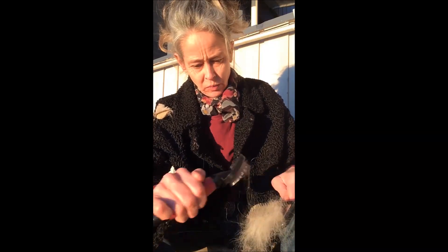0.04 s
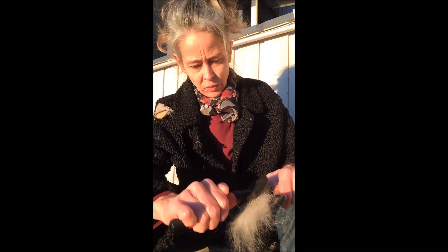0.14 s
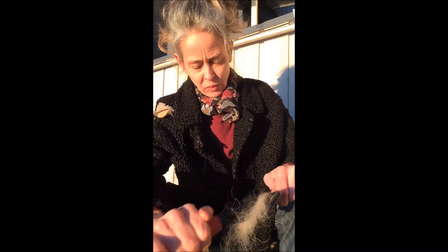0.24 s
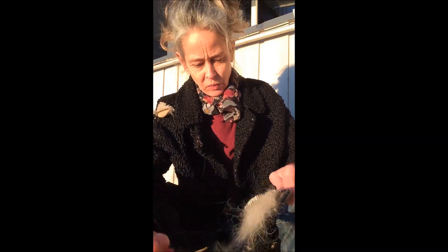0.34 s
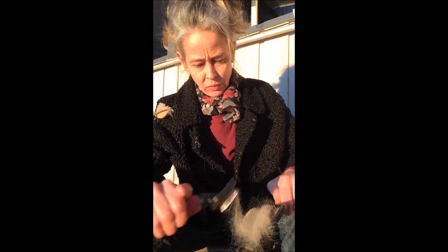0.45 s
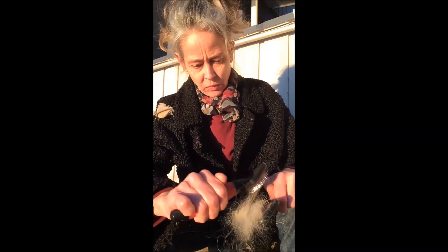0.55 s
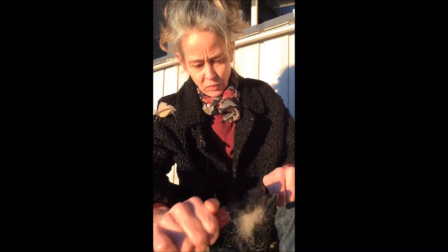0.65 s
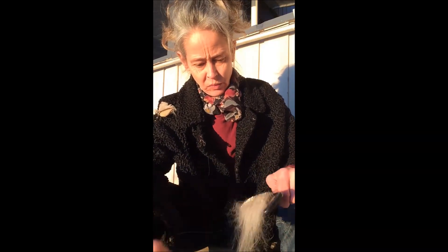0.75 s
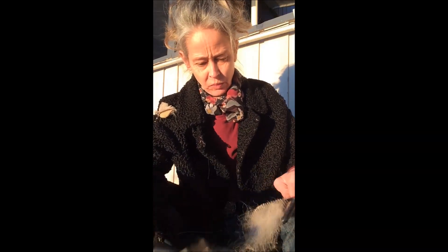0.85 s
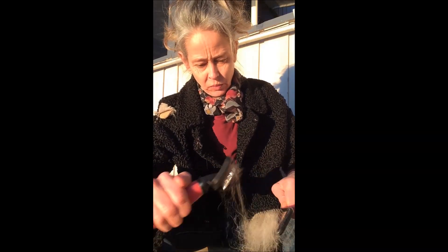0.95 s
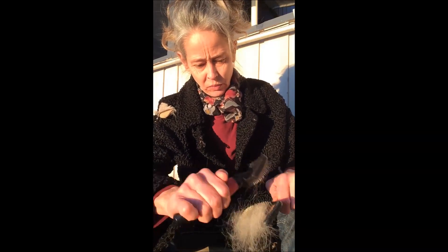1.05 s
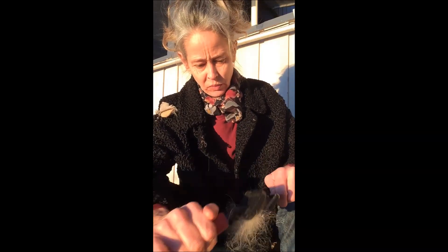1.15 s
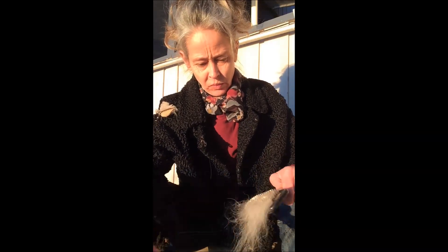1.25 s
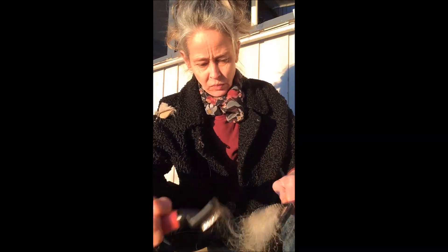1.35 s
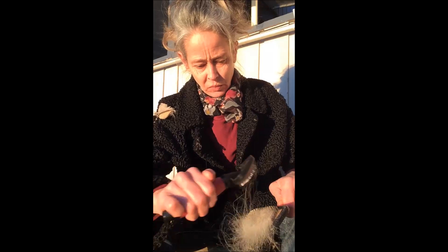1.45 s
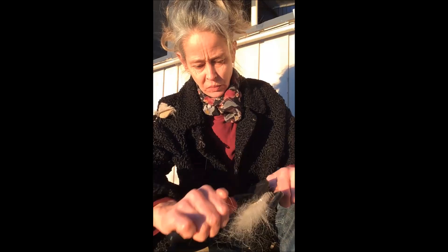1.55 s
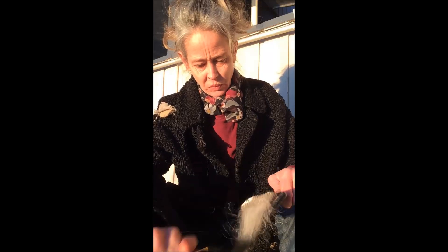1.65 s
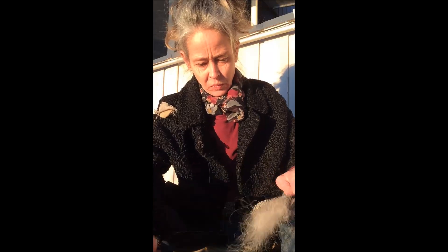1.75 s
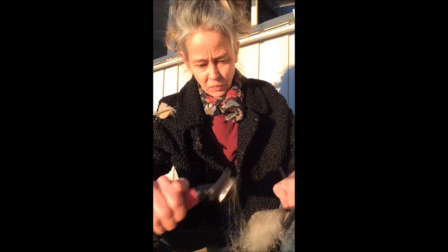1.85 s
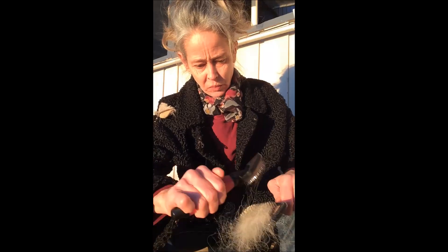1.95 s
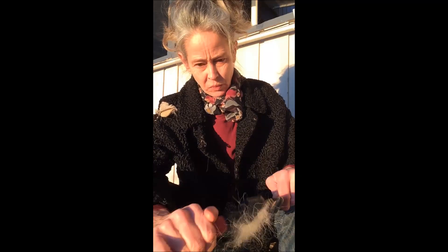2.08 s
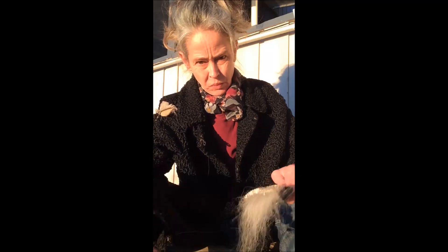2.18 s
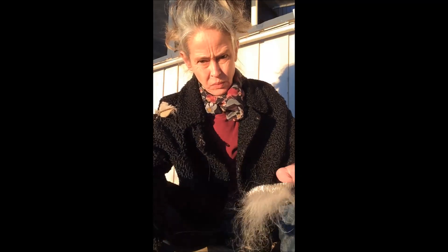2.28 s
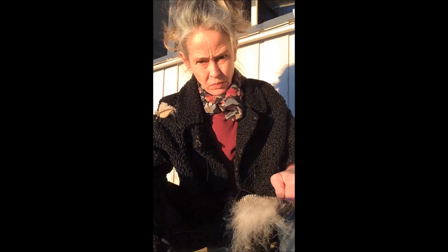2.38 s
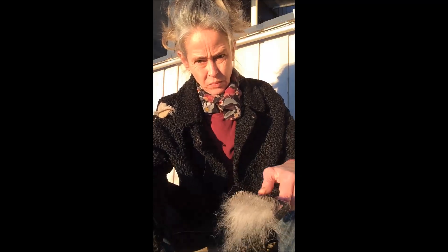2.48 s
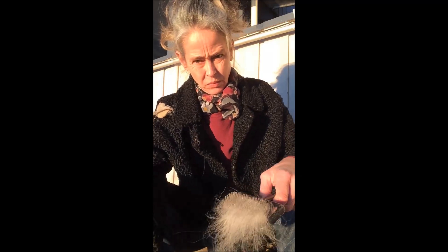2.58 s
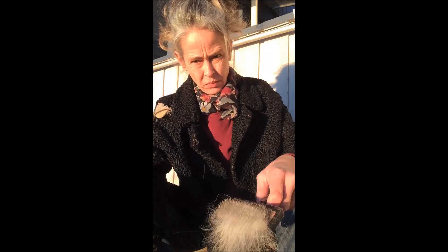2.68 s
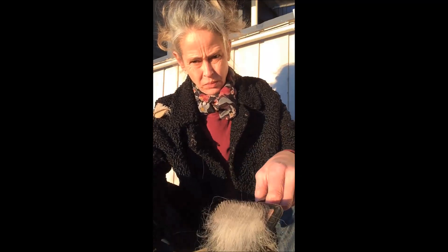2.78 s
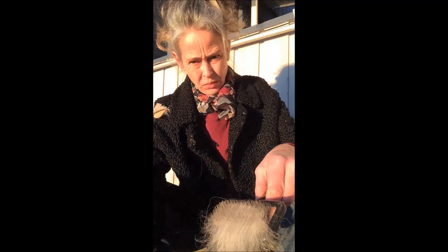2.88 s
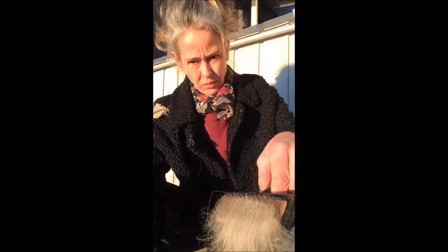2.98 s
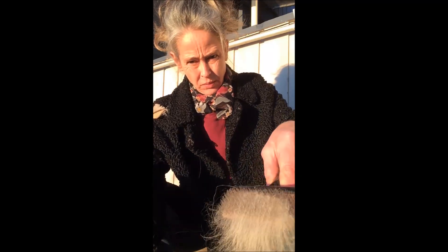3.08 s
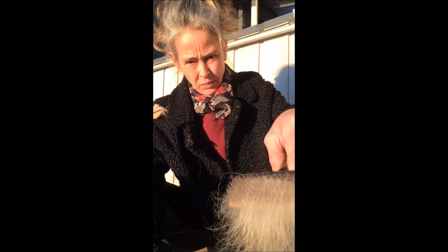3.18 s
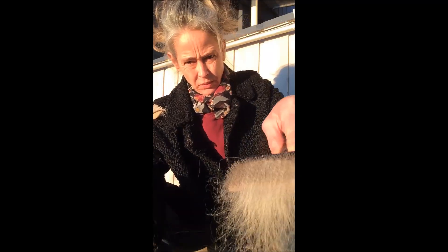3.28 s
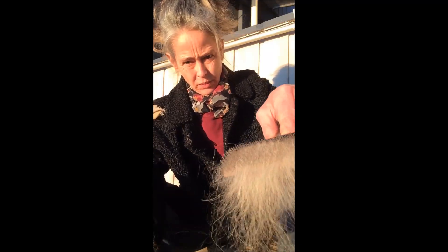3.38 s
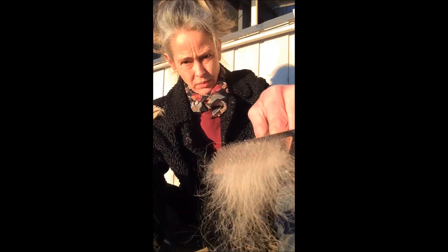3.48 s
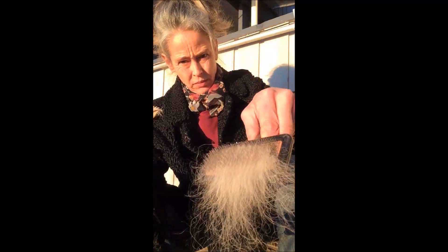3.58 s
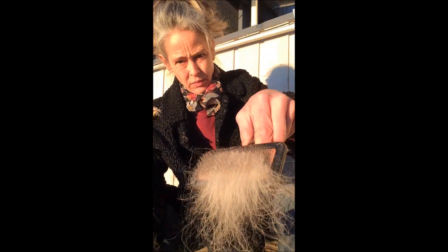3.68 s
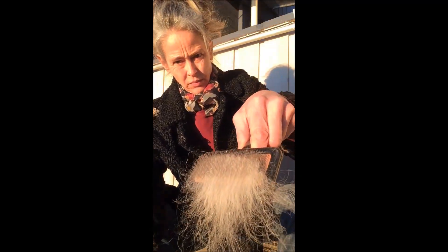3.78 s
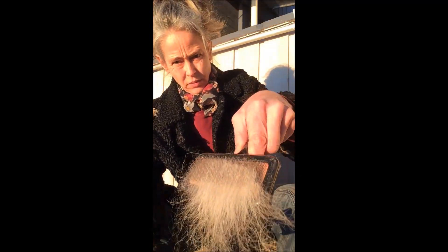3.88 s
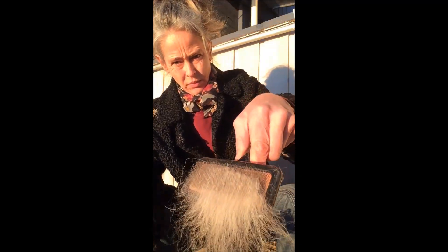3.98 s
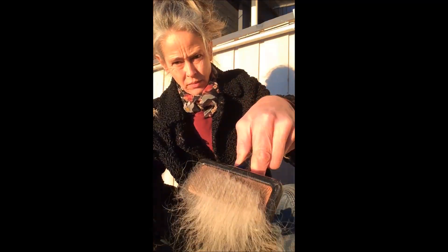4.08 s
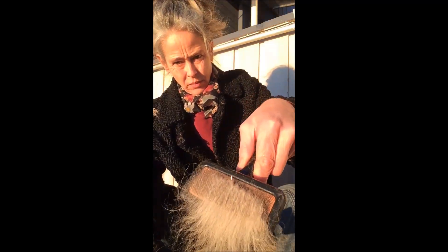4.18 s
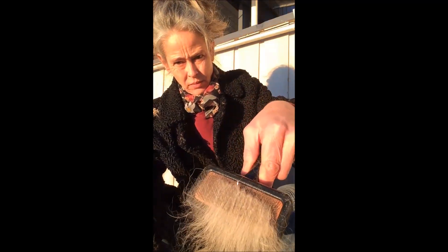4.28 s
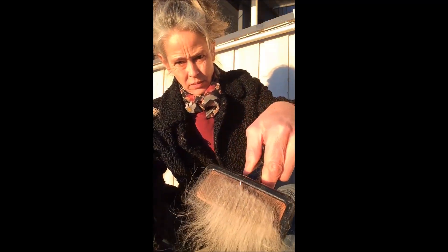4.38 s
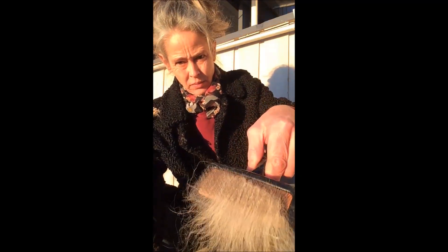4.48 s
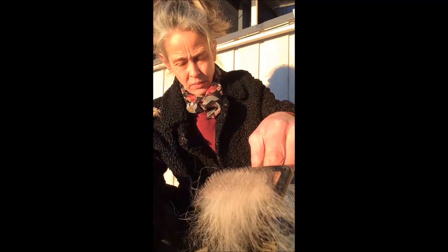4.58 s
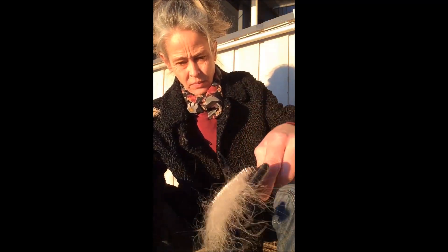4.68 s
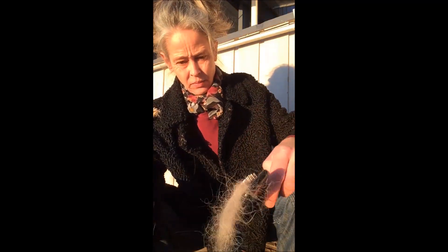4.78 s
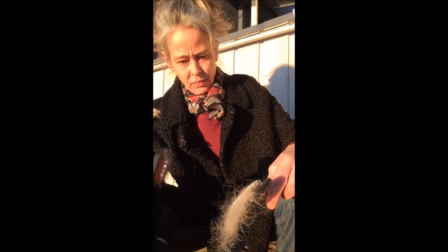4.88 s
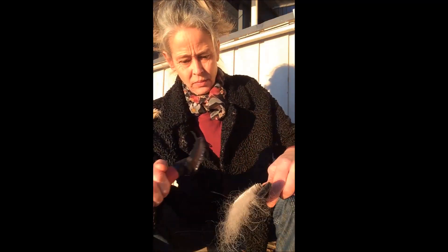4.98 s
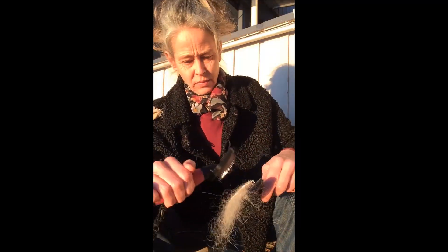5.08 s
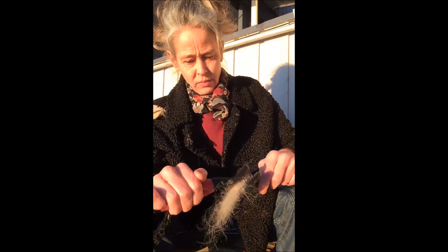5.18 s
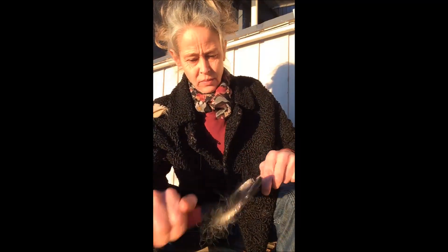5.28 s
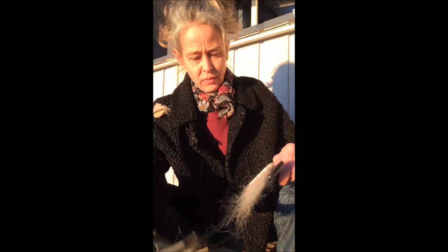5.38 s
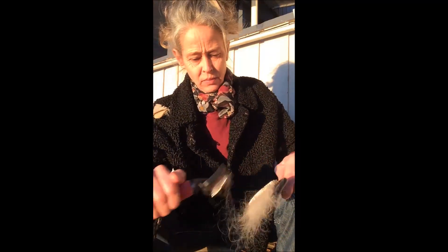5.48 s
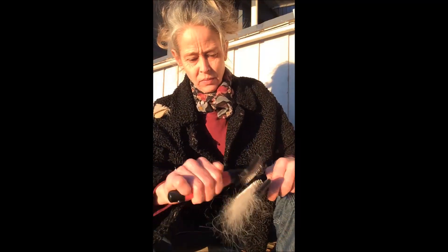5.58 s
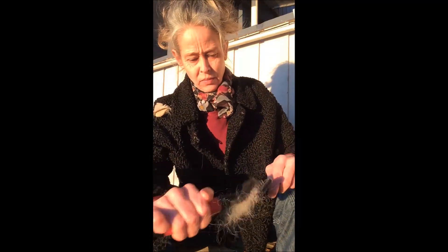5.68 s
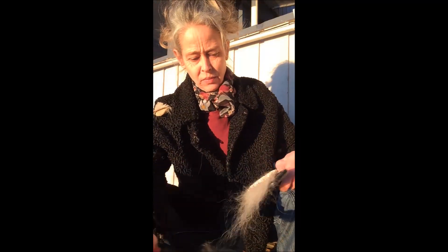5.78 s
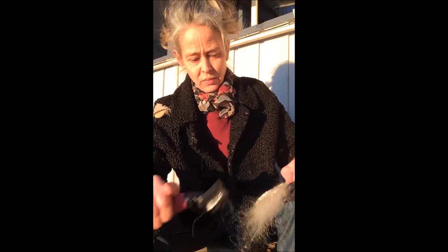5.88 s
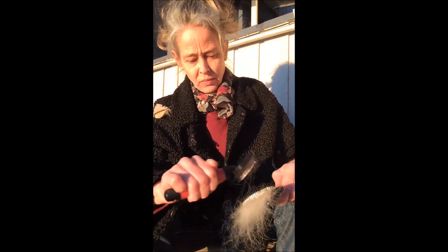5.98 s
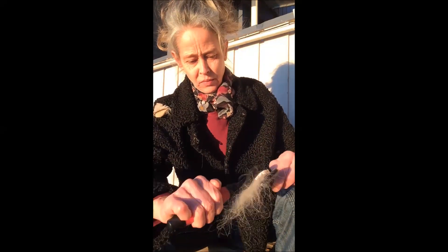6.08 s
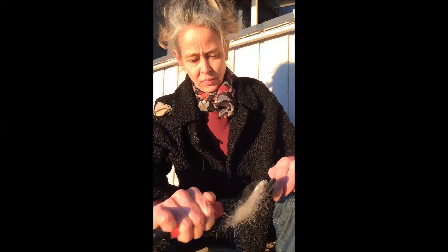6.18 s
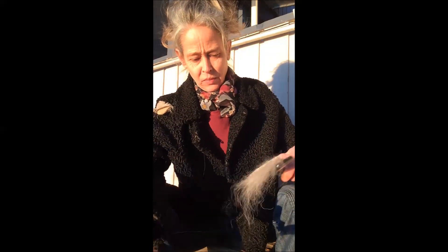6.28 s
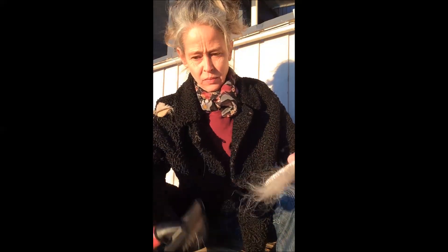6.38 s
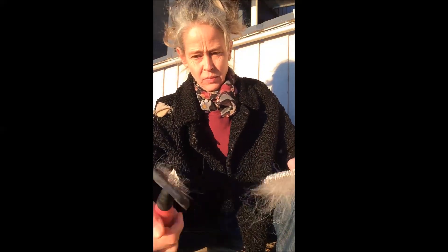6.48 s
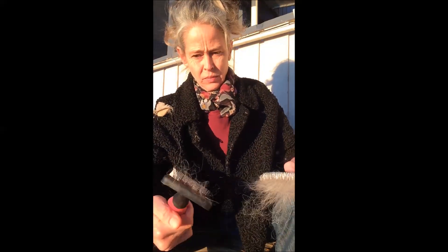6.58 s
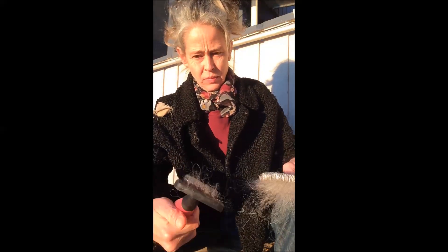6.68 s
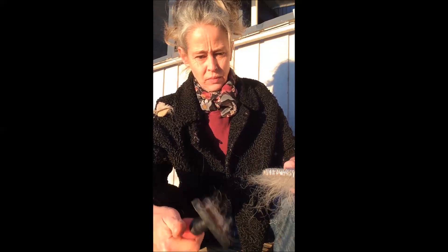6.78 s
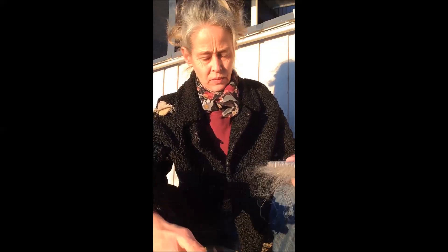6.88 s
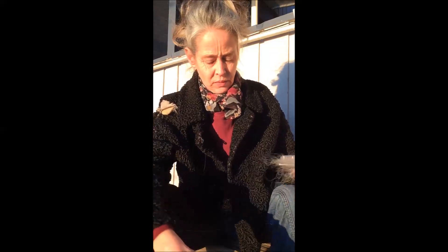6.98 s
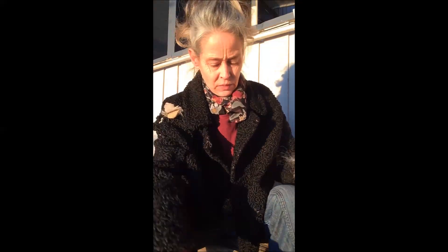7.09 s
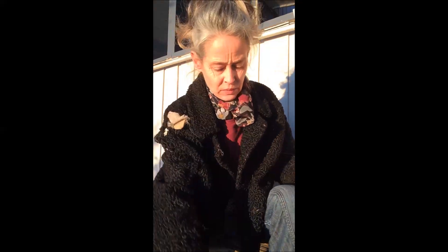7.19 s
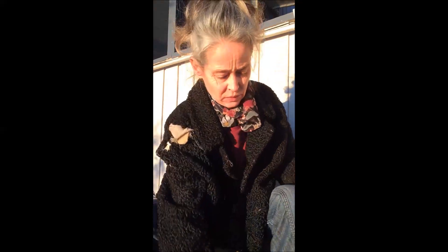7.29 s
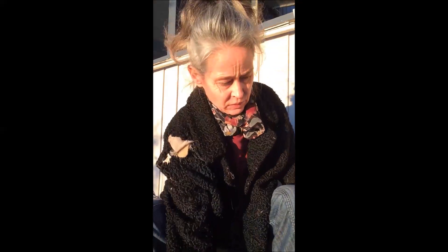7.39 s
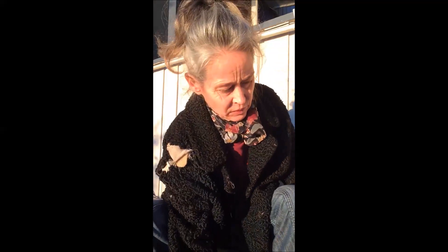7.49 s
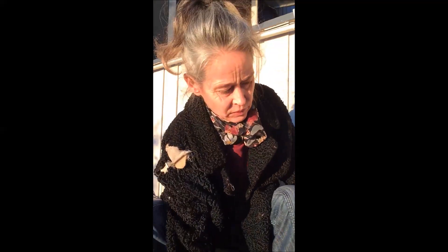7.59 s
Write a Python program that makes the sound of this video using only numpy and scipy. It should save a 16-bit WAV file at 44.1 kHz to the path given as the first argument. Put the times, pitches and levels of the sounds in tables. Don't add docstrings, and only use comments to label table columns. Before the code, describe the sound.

Close to a phone microphone outdoors, two wire pet brushes are knocked together and pulled apart through hair. Five short dry scratches come about half a second apart, each a light plastic knock swelling into bright wiry rasp and sharp snaps. After three quiet seconds of faint coat rustle and distant traffic, three more strokes follow, then cloth rustles softly.

```python
import sys
import numpy as np
from scipy import signal
from scipy.io import wavfile
from scipy.ndimage import uniform_filter1d

SR = 44100
rng = np.random.default_rng(int(sys.argv[2]) if len(sys.argv) > 2 else 0)


def inscribe(sig):
    pcm = np.round(np.clip(np.atleast_2d(sig).T, -1, 1) * 32767)
    wavfile.write(sys.argv[1], SR, pcm.astype(np.int16))


def to_linear_factor(level_db):
    exponent = np.asarray(level_db, float) / 20
    return 10 ** exponent


N = 337365

# pitch in Hz, width in Hz, level in dB.
PIN_MODES = [(3120, 400, -1), (3830, 760, 1), (4560, 1200, 3), (5130, 1000, -0.5), (6960, 970, -13)]
# pitch in Hz, width in Hz, level in dB.
TIP_MODES = [(5000, 650, -3), (6830, 1800, -1), (10760, 2300, -3.5), (12620, 1400, -4.5),
             (16200, 2400, -2.5)]
FREE_DB_S = 1801


def evened(x):
    return x / np.sqrt(np.mean(x ** 2) + 1e-20)


def columns(rows, t):
    s, *values = np.transpose(rows)
    return [np.interp(t, s, v) for v in values]


def add(mix, s, sound):
    part = mix[round(s * SR):][:len(sound)]
    part += sound[:len(part)]


def resonate(x, hz, width):
    return signal.lfilter(*signal.iirpeak(min(hz, 0.45 * SR), hz / width, SR), x)


def body(x, modes):
    total = 0
    for k, (hz, width, db) in enumerate(modes):
        total = total + (-1) ** k * to_linear_factor(db) * resonate(x, hz, width)
    return evened(total)


def slips(per_s, spread_db, clump_db, clump_s):
    chance, size, sign, drift = rng.random((N, 4)).T
    height = to_linear_factor(-spread_db * np.log(size * 0.98 + 0.02))
    clicks = (chance < per_s / SR) * height * np.sign(sign - 0.5)
    span = max(round(clump_s * SR), 2)
    clumps = evened(uniform_filter1d(uniform_filter1d(drift - 0.5, span), span))
    return clicks * to_linear_factor(clump_db * clumps)


def shaped(spectrum, gain_db, patch_db):
    hz = np.fft.rfftfreq(1024, 1 / SR)
    a, b, patches = rng.standard_normal((N // 256 + 5, 513, 3)).T
    patches = evened(uniform_filter1d(uniform_filter1d(patches, 10, 0), 12, 1))
    f, db = np.transpose(spectrum)
    colour_db = np.interp(np.log(hz + 1), np.log(f), db)[:, None]
    z = (a + 1j * b) * to_linear_factor(colour_db + gain_db + patch_db * patches)
    return signal.istft(z, nperseg=1024, noverlap=768)[1][:N]


def raking():
    # pitch in Hz, width in Hz, level in dB.
    pad_modes = [(313, 160, -20), (410, 100, -10), (716, 100, 0.5), (1000, 170, -8), (1280, 150, -2.5),
                 (1800, 900, -8.5)]
    # time in seconds, pad ringing in dB.
    press = [
        [(0.332, -61.5), (0.346, -52.5), (0.372, -34), (0.396, -30.5), (0.432, -34.5), (0.464, -49.5),
         (0.474, -43.5), (0.5, -76)],
        [(0.762, -49), (0.772, -43.5), (0.786, -45.5)],
        [(0.794, -37), (0.816, -28.5), (0.872, -34.5), (0.91, -71), (0.92, -66)],
        [(1.266, -41.5), (1.302, -30), (1.354, -36.5), (1.368, -55.5), (1.39, -71)],
        [(1.703, -46.5), (1.717, -42.5), (1.741, -29.5), (1.795, -33.5), (1.835, -76.5)],
        [(2.175, -52), (2.187, -34), (2.193, -48.5), (2.209, -32), (2.245, -32), (2.305, -37), (2.33, -76.5)],
        [(5.34, -69.5), (5.346, -63.5), (5.426, -36), (5.456, -33.5), (5.48, -72.5), (5.49, -70)],
        [(5.784, -55.5), (5.822, -30.5), (5.874, -32.5), (5.89, -59), (5.905, -58.5)],
        [(6.207, -52.5), (6.223, -54), (6.239, -44.5), (6.255, -57), (6.305, -43.5), (6.311, -39),
         (6.379, -29.5), (6.41, -70)],
    ]
    slide_lead_s = 0.0066
    drag = evened(slips(per_s=2200, spread_db=3.0, clump_db=1.5, clump_s=0.0012))
    flick = evened(slips(per_s=3000, spread_db=3.8, clump_db=3.0, clump_s=0.0015))
    layers = [wires(pad_modes, 1.2 * drag, 1500, 2.0),
              wires(PIN_MODES, drag, 2500, 2.5),
              wires(TIP_MODES, 1.1 * flick, 6000, 2.0)]
    pad, tip = np.zeros(N), tips()
    for rows in press:
        last_s = rows[-1][0]
        t = np.arange(rows[0][0] - slide_lead_s, last_s + 0.05, 1 / SR)
        add(pad, t[0], to_linear_factor(columns(rows, t)[0] - FREE_DB_S * np.maximum(t - last_s, 0)))
    pins = np.hypot(to_linear_factor(-3.5) * pad, to_linear_factor(-8) * tip)
    gains = uniform_filter1d(np.array([pad, pins, tip]), 130)
    return (gains * layers).sum(0)


def wires(modes, shared, per_s, clump_db):
    own = [slips(per_s, spread_db=3.0, clump_db=clump_db, clump_s=0.002) for _ in modes]
    total = 0
    for k, (catches, (hz, width, db)) in enumerate(zip(own, modes)):
        total = total + (-1) ** k * to_linear_factor(db) * resonate(evened(catches) + shared, hz, width)
    return evened(total)


def tips():
    # start in seconds, end in seconds, first level in dB, last level in dB.
    runs = [(0.335, 0.398, -45, -45), (0.406, 0.439, -32.5, -25), (0.756, 0.782, -40, -37),
            (.79, 0.858, -49.5, -43.5), (1.258, 1.328, -41, -47.5), (1.339, 1.348, -29, -29),
            (1.703, 1.748, -37, -43), (1.755, 1.793, -29.5, -28), (2.167, 2.225, -35.5, -46.5),
            (2.228, 2.272, -42.5, -41.5), (2.273, 2.3, -31.5, -28.5), (5.369, 5.397, -68.5, -52.5),
            (5.403, 5.42, -40, -40.5), (5.426, 5.454, -30, -28), (5.78, 5.829, -44, -45.5),
            (5.838, 5.874, -27.5, -26.5), (6.2, 6.248, -57.5, -49), (6.284, 6.318, -56.5, -53),
            (6.32, 6.343, -45.5, -43), (6.349, 6.379, -30.5, -23), (6.386, 6.382, -30.5, -34.5)]
    catch_s = 0.0035
    out = np.zeros(N)
    for start, end, first_db, last_db in runs:
        t = np.arange(0, end - start + 0.12, 1 / SR)
        late = np.maximum(t - (end - start), 0)
        parted = to_linear_factor(-FREE_DB_S * late) + to_linear_factor(-29.5 - 449 * late)
        course = to_linear_factor(np.interp(t, [0, end - start], [first_db, last_db]))
        add(out, start, np.minimum(t / catch_s, 1) * course * parted)
    return out


def snaps():
    # time in seconds, peak in dB, main pitch in Hz.
    torn_rows = [(0.4063, -14.5, 4900), (0.418, -14, 6120), (0.4244, -17.5, 10400), (0.4346, -8.5, 4730),
                 (0.7455, -15, 6000), (1.3105, -21, 3340), (1.3438, -6.5, 5000), (1.351, -23.5, 4510),
                 (1.6893, -12.5, 5040), (1.76, -9.5, 6400), (1.7854, -13.5, 10400), (1.7899, -12, 6580),
                 (1.7958, -11.5, 9370), (2.2335, -17, 4740), (2.2476, -14, 6140), (2.2768, -20, 4720),
                 (2.2934, -8.5, 5330), (5.4058, -21.5, 6530), (5.4263, -14, 8200), (5.4425, -6.5, 8200),
                 (5.836, -10.5, 4680), (5.842, -10, 5180), (5.87, -15, 4830), (6.342, -10.5, 6470),
                 (6.35, -10.5, 4130), (6.3564, -7.5, 10350), (6.365, -3.5, 5990), (6.3674, -6.5, 8400),
                 (6.375, -5, 7100), (6.3819, -20.5, 5040)]
    # time in seconds, peak in dB, main pitch in Hz.
    ticks = [(0.3329, -34.5, 5530), (0.473, -22.5, 3280), (2.3369, -38, 4130), (2.5581, -45, 6660),
             (2.6, -39.5, 5500), (4.0751, -43.5, 3700), (4.2194, -57, 3550), (5.0104, -40, 2600),
             (5.009, -37, 7000), (5.3209, -24, 3120), (5.361, -42.5, 4280), (5.227, -55.5, 3000),
             (5.3774, -27, 3820), (6.2159, -31, 4720), (6.2499, -35, 4960), (6.2735, -29, 4250),
             (6.2853, -19, 4210), (6.258, -31, 4500), (6.2215, -29.5, 4500), (6.2979, -26, 4330),
             (6.2907, -24, 4770), (6.305, -22.5, 4530), (1.678, -43, 6000), (2.2572, -20, 4340),
             (5.396, -18, 4500), (5.418, -18.5, 6900)]
    out, t = np.zeros(N), np.arange(1500) / SR
    click = 1.0 * (np.arange(len(t)) == 30)
    crack = body(click, PIN_MODES + TIP_MODES)
    crack = crack / abs(crack).max()
    # tip level in dB, strength of the crack
    rows = [(*row, -10, 1.195) for row in torn_rows] + [(*row, -23, 0.21) for row in ticks]
    noises = rng.standard_normal((len(rows), len(t)))
    fade = (1 - np.exp(-t / 0.00028)) * to_linear_factor(-60 * t / 0.008)
    for (s, db, hz, tips_db, lead), noise in zip(rows, noises):
        burst = 0.6 * evened(resonate(noise, hz, 0.31 * hz)) + to_linear_factor(tips_db + 3.0) * body(noise, TIP_MODES)
        add(out, s, to_linear_factor(db - 7.5) * (burst * fade + lead * crack))
    return out


def knocks():
    # time in seconds, peak in dB, pad pitch in Hz,
    # thud in dB over the peak, tip clash in dB over the peak.
    blows = [(0.316, -40, 830, -12, 8.5), (0.3203, -37.5, 650, -6, -11), (0.4727, -34.5, 790, -10.5, -5),
             (0.744, -22.5, 682, -17, -2), (1.2525, -19.5, 816, -7.5, 0), (1.6898, -18, 717, -29, 0),
             (2.1623, -25, 735, -8, -0.5), (3.9514, -59, 600, -20, -20), (5.76, -37.5, 1320, -13, -20),
             (5.7692, -28, 710, -1.5, -3.5), (6.1935, -24.5, 717, -21.5, -3.5)]
    # time in seconds, peak in dB, pad pitch in Hz, pin clash in dB over the peak.
    touches = [(0.308, -53, 670, 9), (1.2458, -34.5, 860, 7.5), (2.158, -27, 630, -5),
               (5.316, -39, 640, -2.5), (5.322, -37, 716, -8), (6.187, -35, 1000, 5.5)]
    out, t = np.zeros(N), np.arange(2600) / SR
    rows = [(s, db, hz, thud, -13.5, tip) for s, db, hz, thud, tip in blows]
    rows += [(s, db, hz, -16, pin, -12) for s, db, hz, pin in touches]
    noises = rng.standard_normal((len(rows), len(t)))
    contact = t / 0.0015 * np.exp(1 - t / 0.0015)
    thud = 2.53 * np.sin(2 * np.pi * 290 * t) * t / 0.0014 * np.exp(1 - t / 0.0011)
    settle = to_linear_factor(-60 * t / 0.012) + 0.2 * to_linear_factor(-60 * t / 0.08)
    onset = 1 - np.exp(-t / 0.00051)
    for (s, db, hz, thud_db, pins_db, tips_db), noise in zip(rows, noises):
        ring = contact * (-np.sin(2 * np.pi * hz * t) + 0.44 * evened(resonate(noise, 1.53 * hz, 620)))
        clash = to_linear_factor(pins_db) * body(noise, PIN_MODES) + to_linear_factor(tips_db) * body(noise, TIP_MODES)
        clash = 0.7 * clash * settle * onset
        add(out, s, to_linear_factor(db - 1.0) * (ring + to_linear_factor(thud_db) * thud + clash))
    return out


def bump():
    start_s, level_db, pitch_hz, contact_s = 3.948, -45, 314, 0.0027
    out, t = np.zeros(N), np.arange(2000) / SR
    push = t / contact_s * np.exp(1 - t / contact_s)
    add(out, start_s, to_linear_factor(level_db) * push * np.sin(2 * np.pi * pitch_hz * t))
    return out


def yard(x):
    t = np.arange(SR // 3) / SR
    taps = rng.choice([-1.0, 1.0], len(t)) * (rng.random(len(t)) < 2500 / SR) * (t > 0.004)
    dull = signal.lfilter([0.4], [1, -0.6], taps)
    bright = taps - dull
    tail = dull * to_linear_factor(-60 * t / 0.2) + 0.6 * bright * to_linear_factor(-60 * t / 0.13)
    return signal.fftconvolve(x, tail / np.linalg.norm(tail))[:N]


def rustle():
    # frequency in Hz, level in dB per Hz.
    cloth = [(760, -31), (1300, -2), (1510, -2.5), (2130, -4), (4680, -8.5), (7430, -11), (16000, -20)]
    frames = np.arange(N // 256 + 5) * 256 / SR
    level, fine_db = arms(frames)
    fine_db = np.clip(fine_db + 3.5, -10, 12)
    above = np.clip(np.fft.rfftfreq(1024, 1 / SR) / 3500 - 1.3, 0, 1)[:, None]
    hiss = shaped(cloth, above * fine_db, patch_db=2.5)
    hiss = hiss / np.std(resonate(hiss, 3500, 4800))
    crackle = body(slips(per_s=600, spread_db=6.0, clump_db=2.5, clump_s=0.035), PIN_MODES)
    level = to_linear_factor(0.5) * np.interp(np.arange(N) / SR, frames, level)
    return level * (hiss + 0.12 * crackle)


def arms(t):
    # middle in seconds, half length in seconds, rustle in dB, fine hiss in dB over the rustle.
    moves = [(0, 0.035, -66, -1), (0.177, .06, -82.5, -10), (0.666, .04, -82.5, -11.5),
             (1.056, .04, -66.5, -14), (1.229, 0.08, -75.5, -9), (1.65, .08, -80, -7),
             (1.925, .1, -78, -11), (2.719, 0.22, -78, -5), (3.084, .04, -78, -7.5),
             (3.346, .12, -78, -8.5), (3.775, .08, -83, -6.5), (4.114, 0.2, -77.5, -14),
             (4.463, 0.079, -78.5, -15.5), (4.834, 0.056, -75, -11), (5.152, 0.17, -80.5, -4.5),
             (5.706, .06, -77, -9), (6.132, .06, -79, -7), (6.66, 0.11, -73.5, -5.5), (6.9, .04, -77, -11),
             (7.045, 0.12, -77, -5), (7.206, .05, -71.5, -9), (7.436, 0.24, -70, -2.5)]
    still_db, still_fine_db = -88, 0
    s, half, db, fine_db = np.transpose(moves)[:, :, None]
    swells = to_linear_factor(db) * np.exp(-((t - s) / half) ** 2)
    level = to_linear_factor(still_db) + swells.sum(0)
    return level, (to_linear_factor(still_db) * still_fine_db + (swells * fine_db).sum(0)) / level


def street():
    # frequency in Hz, level in dB per Hz.
    air = [(18, -35), (30, -10), (55, -4), (81, 3.5), (131, -4), (174, -8.5), (311, -12), (384, -12),
           (526, -12.5), (1010, -12.5), (1720, -22), (7270, -34), (16000, -46)]
    # time in seconds, level in dB.
    traffic = [(0, -65), (2.5, -65), (5.5, -65.5), (6, -65.5), (6.9, -65.5), (7.25, -63), (7.65, -63.5)]
    # time in seconds, level in dB.
    engine = [(0.0, -66.5), (0.53, -59.5), (1.3, -65), (1.36, -75.5), (1.89, -60.5), (2.85, -69.5),
              (3.32, -60), (3.77, -78), (4.01, -64.5), (4.32, -77), (4.67, -68), (5.24, -72), (5.43, -88),
              (5.56, -63), (5.69, -74), (6.47, -59.5), (6.56, -67.5), (7.65, -76)]
    # time in seconds, level in dB.
    passing = [
        (3.8, -96),
        (4.1, -76),
        (4.9, -71),
        (5.2, -92),
    ]
    hum_hz, drone_hz = 76, 365.4
    t = np.arange(N) / SR
    wash = shaped(air, 0, patch_db=0.78)
    wash = wash / np.std(resonate(wash, 500, 1400))
    a, b = rng.standard_normal((2, N))
    wander_hz = 0.45 * evened(uniform_filter1d(uniform_filter1d(a, size=9000), size=9000))
    hum = np.sqrt(2) * np.sin(2 * np.pi * np.cumsum(hum_hz + wander_hz) / SR)
    hum = hum + 0.3 * evened(resonate(resonate(a, hum_hz, 6), hum_hz, 6))
    overtone = evened(resonate(resonate(b, 1.5 * hum_hz, 14), 1.5 * hum_hz, 14))
    hum = hum + to_linear_factor(-5.5) * overtone
    drone = evened(resonate(resonate(b, drone_hz, 40), drone_hz, 40))
    wash = to_linear_factor(columns(traffic, t)[0]) * wash
    hum = to_linear_factor(columns(engine, t)[0] - 1.0) * hum
    return wash + hum + to_linear_factor(columns(passing, t)[0]) * drone


def scene():
    brushes = raking() + knocks() + snaps() + bump()
    return (brushes + to_linear_factor(-22.5) * yard(brushes) + street() + rustle())[None]


def band_limit(x):
    return signal.sosfilt(signal.butter(12, 17140, fs=SR, output="sos"), x)


def record(dry):
    edge_hz = 15950
    x = signal.sosfilt(signal.butter(2, 45, "high", fs=SR, output="sos"), dry)
    under = signal.oaconvolve(x, signal.firwin(401, edge_hz, fs=SR)[None], "same")
    spill = to_linear_factor(-36) * (x - under)
    return band_limit(under + spill)


dry = scene()
out = record(dry)
inscribe(out)
```